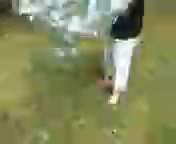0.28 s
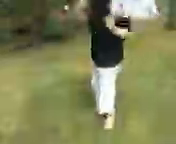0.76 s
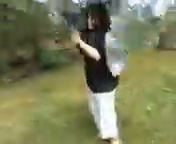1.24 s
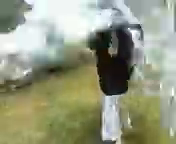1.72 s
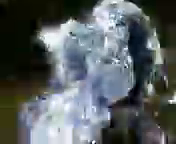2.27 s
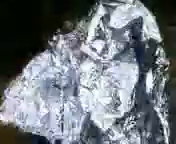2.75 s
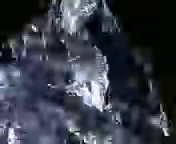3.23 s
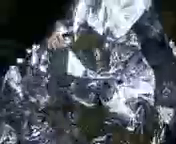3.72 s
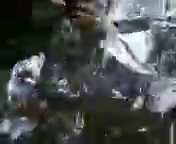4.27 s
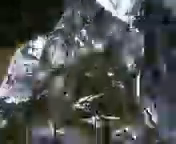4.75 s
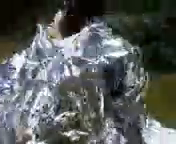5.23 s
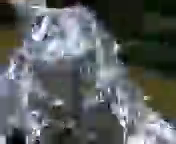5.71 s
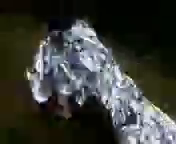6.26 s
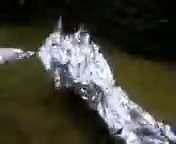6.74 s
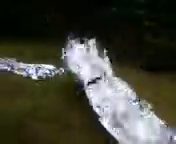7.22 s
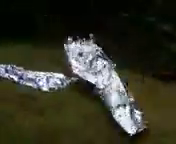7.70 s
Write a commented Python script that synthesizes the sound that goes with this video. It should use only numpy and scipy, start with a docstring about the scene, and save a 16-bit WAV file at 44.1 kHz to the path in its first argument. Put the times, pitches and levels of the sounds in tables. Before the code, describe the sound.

Close, dense rustling of a foil sheet swells and eases with occasional sharp cracks, while an engine hums nearby.

```python
"""Foil blanket on a lawn

A foil blanket is swung and gathered up: thousands of tiny creases snap through, large ones crack.
Pulled taut once, it rattles in a fast run of cracks; later its folds push three puffs of air.
An engine hums nearby over outdoor rumble, slowly sinking in pitch.
The small recorder passes only a telephone-wide band and overloads on the loudest cracks."""
import sys
import numpy as np
from scipy import signal
from scipy.fft import rfft, irfft, next_fast_len
from scipy.io import wavfile
from scipy.ndimage import uniform_filter1d

SR = 44100
rng = np.random.default_rng(int(sys.argv[2]) if len(sys.argv) > 2 else 0)


def transcribe(u):
    """Save the signal u as a 16-bit wav file named by the first command-line argument.

    u: samples, shape (n,) or (channels, n), limited to [-1, 1]; the rate is SR.
    q: integer samples, one column per channel.
    """
    v = np.clip(np.atleast_2d(u).T, -1, 1)
    q = np.round(v * 32767).astype(np.int16)
    wavfile.write(sys.argv[1], SR, q)


N = 351477

# swings and grabs: (peak time [s], level [dB], rise [s per 10 dB], fall [s per 10 dB], tightness [dB])
SHEET_SWINGS = [(.02, -12.5, 1.1, 0.3527, 5.5), (.79, -27.5, .25, 0.1, -3.5), (1.55, -23, 0.52, 0.2, -0.5),
                (2.15, -27, 0.2, .5, -0.5), (2.575, -20.5, 0.18, 0.14, 2), (2.98, -23, 0.25, 0.2, -1),
                (3.2, -22.5, 0.15, 0.23, -1.5), (3.47, -22, .17, .17, -2.5), (3.93, -15.5, 0.21, 0.08, 1.5),
                (4.01, -22, -0.02, -0.02, -3.5), (4.088, -19, .02, .04, 4), (4.18, -16.5, .06, 0.15, 3.5),
                (4.44, -23.5, 0.14, 0.56, -0.5), (4.82, -23.5, 0.1, 0.37, -4), (5.005, -16, 0.04, 0.15, 2),
                (5.2, -23, .2, 0.6, 0.5), (5.53, -24.5, .3, .22, 0), (6.09, -15.5, 0.0958, 0.34, 0),
                (6.369, -20, 0.26, 0.18, 0), (6.76, -24.5, 0.2, 0.22, 1.5), (6.95, -20.5, 0.13, 0.17, 0.5),
                (7.295, -15.5, .05, 0.1, 5.5), (7.62, -24.5, 0.15, .22, 2.5), (7.96, -22, .07, -0.6, 3)]
# crease spectrum: (frequency [Hz], gain [dB])
CREASE_SPECTRUM = [(150, -10.5), (250, -4), (480, 0), (750, 0.5), (1250, 3), (1500, 2.5), (1850, 2),
                   (2300, 0.5), (2750, 2), (3400, -3), (4200, -4)]
# air cupped by the billowing sheet: (time [s], half-width [s], resonance [Hz], gain [dB])
BILLOW_CAVITIES = [(0.022, 0.05, 1140, 3), (0.18, .08, 1000, 2.5), (3.873, 0.058, 1720, -4.5),
                   (3.921, 0.023, 604, 2), (5.094, 0.082, 1325, -2.5), (7.27, .04, 700, -0.5)]
# large creases giving way: (time [s], relative peak [dB])
LARGE_CRACKS = [(.007, 1), (.013, -0.5), (.045, -6.5), (.788, -12.5), (2.97, -8.5), (3.912, -11),
                (3.936, -5), (3.986, -8.5), (4.004, -8), (4.086, -1.5), (4.093, -7), (4.111, -7.5),
                (4.118, -4.5), (4.989, -8), (5.127, -11.5), (6.164, -7), (6.198, -8), (6.693, -9),
                (7.277, -10)]
# modes of a cracking panel: (frequency [Hz], gain [dB], T60 [s])
PANEL_MODES = [(700, -12.5, 0.0069), (1260, -5.5, 0.0085), (1660, -1.5, 0.0078), (1993, 0.5, 0.007),
               (2770, -4, 0.0063), (3230, -1.5, 0.0058), (3650, -3, 0.005)]
# air pushed by folds: (onset [s], envelope peak [dB], frequency [Hz])
FOLD_PUFFS = [(5.446, -19, 115), (5.556, -23, 99), (5.695, -21, 105)]
# engine hum: (time [s], level [dB])
HUM_LEVEL = [(0, -43), (.17, -41.5), (.44, -31.5), (.73, -31.5), (1.05, -28.5), (1.85, -30), (3.18, -33),
             (3.38, -37.5), (3.68, -29.5), (4.35, -25.5), (4.95, -26), (5.6, -33), (6.2, -33.5),
             (6.55, -29), (7.15, -29), (7.35, -32.5), (7.97, -23)]
# exhaust tone: (multiple of firing rate, relative level [dB])
EXHAUST_HARMONICS = [(1, 1), (2, -22), (3, -35.5), (5, -19.5)]
# outdoor rumble: (frequency [Hz], relative density [dB])
RUMBLE_SPECTRUM = [(15, -42), (25, -29), (40, -17.5), (62, -5), (90, -1), (130, -1), (185, 0), (260, -3.5),
                   (400, -6.5), (800, -15), (2000, -35)]
# air stirred at the microphone: (time [s], relative level [dB])
STIRRED_AIR_LEVEL = [(0, -36.5), (1.0, -34.5), (3.75, -37.5), (3.95, -32.5), (4.25, -31), (4.6, -35),
                     (5.05, -32), (5.7, -35), (7.97, -35)]
# brief surges just above the hum: (time [s], level [dB])
BASS_SWELLS = [(.58, -34), (1.042, -34.5), (2.0, -36)]


def crinkle(motion_db, tightness_db, snaps_per_s=4200, papery_hz=1860, papery_db=-9.5, width_hz=260):
    """Faster movement sets off more creases, a dense crackle of random snaps."""
    crease_rate = snaps_per_s * from_db((motion_db - np.mean(motion_db)) / 2)
    foil = creases(crease_rate, tightness_db) + from_db(-7) * facet_pops()
    foil = foil * from_db(0.16 * drift(45))
    # the commonest facet size gives a steady papery note
    foil = foil + from_db(papery_db) * resonance(foil, papery_hz, width_hz)
    for time_s, half_width_s, hz, db in BILLOW_CAVITIES:
        foil = foil + from_db(db) * bump(time_s, half_width_s) * resonance(foil, hz, width_hz)
    running_rms = np.sqrt(uniform_filter1d(foil ** 2, size=2000) + 1e-12)
    flutter_db = 0.7 * drift(18)
    return foil / running_rms * from_db(motion_db + 0.5 + flutter_db)


def creases(per_s, tightness_db, spread_db=2.5, patchy_db=2.5, sheet_share=0.34):
    """Whole-sheet snaps sound in every band; each facet size also ticks in its own band."""
    whole_sheet = unit_rms(snaps(per_s, spread_db))
    edges_hz = np.geomspace(170, 4600, num=17)
    out = 0
    for low_hz, high_hz in zip(edges_hz, edges_hz[1:]):
        facets = unit_rms(snaps(per_s / 2, spread_db))
        drive = np.sqrt(sheet_share) * whole_sheet + np.sqrt(1 - sheet_share) * facets
        band = signal.sosfilt(signal.butter(1, [low_hz, high_hz], "band", fs=SR, output="sos"), drive)
        hz = np.sqrt(low_hz * high_hz)
        tilt_db = 0.41 * tightness_db * np.log2(max(hz, 700) / 1800)  # tighter folds sound brighter
        out = out + band * from_db(spectrum_db(CREASE_SPECTRUM, hz) + tilt_db + patchy_db * drift(14))
    return unit_rms(out)


def facet_pops(per_s=240, t60_cycles=42, count=26):
    """Flat facets pop over, each ringing briefly at its own pitch."""
    pitches_hz = np.linspace(750, 3500, count) * from_db(.2 * rng.standard_normal(count))
    clicks = snaps(per_s, spread_db=1.9)
    facet = rng.integers(0, count, N)
    pops = sum(ring(clicks * (facet == k), hz, t60_cycles / hz) for k, hz in enumerate(pitches_hz))
    return unit_rms(pops)


def snaps(per_s, spread_db):
    """Random clicks, many small and few large, buckling either way."""
    sizes = from_db(spread_db * np.minimum(rng.exponential(1, N), 4.5))
    return sizes * rng.choice([-1, 1], N) * (rng.random(N) < per_s / SR)


def sheet_motion(rest_db=-31.0, rest_tightness_db=-4):
    """Level and tightness [dB]: swings add their power to a resting crinkle and blend their tightness."""
    t = np.arange(0, N + 100, 100) / SR
    power = np.full(len(t), from_db(rest_db) ** 2)
    weighted_tightness = power * rest_tightness_db
    for peak_s, db, rise_s, fall_s, tightness_db in SHEET_SWINGS:
        drop_db = 10 * np.maximum((peak_s - t) / rise_s, (t - peak_s) / fall_s)
        swing_power = from_db(db - drop_db) ** 2
        power += swing_power
        weighted_tightness += swing_power * tightness_db
    return per_sample(np.transpose([t, 10 * np.log10(power), weighted_tightness / power]))


def cracks(gain_db=-2.5, slip_decay_s=0.0015, stiffening=0.96):
    """A large crease gives way in a short burst of slips that rings the panel."""
    t = np.arange(SR // 40) / SR
    out = np.zeros(N + len(t))
    for time_s, peak_db in list(LARGE_CRACKS) + rattle():
        slips = rng.choice([-1, 1], len(t)) * np.exp(-t / slip_decay_s)
        crack = sum((-1) ** k * from_db(db) * ring(slips, hz, t60_s)
                    for k, (hz, db, t60_s) in enumerate(PANEL_MODES))
        # the film stiffens as it bends, rounding the peaks
        crack = np.tanh(stiffening * crack / np.max(np.abs(crack))) / np.tanh(stiffening)
        start = round(time_s * SR)
        out[start:start + len(t)] += from_db(peak_db + gain_db) * crack
    return out[:N]


def rattle(climax_s=4.172, gap_s=.0055, count=10, peak_db=2.0, rise_db_per_s=140, fall_db_per_s=400):
    """The taut sheet's run of cracks swells and breaks off: rows (time [s], relative peak [dB])."""
    offset_s = gap_s * (2 - np.arange(count) + .15 * rng.standard_normal(count))
    drop_db = np.maximum(-offset_s * rise_db_per_s, offset_s * fall_db_per_s)
    return list(zip(climax_s + offset_s, peak_db - drop_db))


def puffs(rise_s=.005):
    """Each flapping fold pushes one dull swing of air."""
    out = 0
    for onset_s, peak_db, hz in FOLD_PUFFS:
        age_s = np.maximum(np.arange(N) / SR - onset_s, 0)
        envelope = age_s / rise_s * np.exp(1 - age_s / rise_s)
        out = out + from_db(peak_db) * envelope * np.sin(2 * np.pi * hz * age_s)
    return out


def engine(start_hz=147.1, sag_hz_per_s=1.72, wander=.003, throb_db=1.28):
    """Exhaust hum with faint overtones; the firing is slightly uneven and slows steadily."""
    firing_hz = (start_hz - sag_hz_per_s * np.arange(N) / SR) * (1 + wander * drift(4.5))
    phase = 2 * np.pi * np.cumsum(firing_hz) / SR
    tone = sum(from_db(db) * np.sin(k * phase) for k, db in EXHAUST_HARMONICS)
    hum_db, = per_sample(HUM_LEVEL)
    return unit_rms(tone) * from_db(hum_db + throb_db * drift(30))


def rumble(motion_db, air_gain_db=2.0, motion_share=.2, deep_gain_db=-34.5, split_hz=100):
    """Steady deep outdoor rumble; above it, air stirred by the sheet comes and goes."""
    air_db = per_sample(STIRRED_AIR_LEVEL)[0] + motion_share * (motion_db - np.mean(motion_db))
    hz = np.maximum(np.fft.rfftfreq(N, 1 / SR), 1)
    spectrum = rfft(rng.standard_normal(N)) * from_db(spectrum_db(RUMBLE_SPECTRUM, hz))
    noise = unit_rms(irfft(spectrum, N))
    deep = irfft(rfft(noise) / (1 + (hz / split_hz) ** 6), N)
    return deep * from_db(deep_gain_db) + (noise - deep) * from_db(air_db + air_gain_db)


def bass_swells(hz=212.5, width_hz=35, half_width_s=.09):
    """Short, soft surges of narrow low noise."""
    noise = resonance(resonance(rng.standard_normal(N), hz, width_hz), hz, width_hz)
    return unit_rms(noise) * sum(from_db(db) * bump(time_s, half_width_s) for time_s, db in BASS_SWELLS)


def from_db(db):
    """Decibels to gain."""
    return 10 ** (np.asarray(db) / 20)


def unit_rms(x):
    """Scale to RMS 1."""
    return x / np.sqrt(np.mean(x ** 2) + 1e-20)


def per_sample(rows):
    """Interpolate rows (time [s], values...) to one curve per value column."""
    times_s, *columns = np.transpose(rows)
    return [np.interp(np.arange(N) / SR, times_s, column) for column in columns]


def spectrum_db(rows, hz):
    """Interpolate a spectrum over log frequency."""
    knots_hz, knots_db = np.transpose(rows)
    return np.interp(np.log(hz), np.log(knots_hz), knots_db)


def drift(rate_hz):
    """Smooth random curve, RMS 1."""
    pole = np.exp(-40 * np.pi * rate_hz / SR)
    noise = rng.standard_normal(N // 20 + 4002)
    slow = signal.lfilter([1], [1, -2 * pole, pole * pole], noise)[4000:]
    return np.interp(np.arange(N) / 20, np.arange(len(slow)), unit_rms(slow))


def bump(time_s, half_width_s):
    """Gaussian envelope, peak 1."""
    return np.exp(-((np.arange(N) / SR - time_s) / half_width_s) ** 2)


def ring(clicks, hz, t60_s):
    """Damped mode: a unit click starts a sine of height 1."""
    radius, angle = from_db(-60 / (t60_s * SR)), 2 * np.pi * hz / SR
    return signal.lfilter([0, np.sin(angle)], [1, -2 * radius * np.cos(angle), radius ** 2], clicks + 1e-18)


def resonance(x, hz, width_hz):
    """Resonant band-pass, peak gain 1."""
    radius, angle = np.exp(-np.pi * width_hz / SR), 2 * np.pi * hz / SR
    numerator = np.array([1, 0, -1]) * (1 - radius ** 2) / 2
    return signal.lfilter(numerator, [1, -2 * radius * np.cos(angle), radius ** 2], x)


def scene():
    """Blanket close by, engine and rumble behind; mono."""
    motion_db, tightness_db = sheet_motion()
    blanket = crinkle(motion_db, tightness_db) + cracks() + puffs()
    return (blanket + engine() + rumble(motion_db) + bass_swells())[None]


def record(dry, headroom=0.85, overload=.73, cutoff_hz=16000):
    """The microphone adds a bright peak and rounds big swings; treble is cut, overshoots clip."""
    bright = dry + from_db(-6.5) * resonance(dry, hz=3360, width_hz=420)
    rounded = bright / (1 + (bright / headroom) ** 6) ** (1 / 6)
    fft_size = next_fast_len(N + SR // 10)
    hz = np.fft.rfftfreq(fft_size, 1 / SR)
    voice_band_db = np.interp(hz, [3475, 4543, 4793], [0, -32, -90])
    narrow = irfft(rfft(rounded, fft_size) * from_db(voice_band_db), fft_size)[:, :N]
    clipped = np.clip(narrow, -overload, overload)
    return signal.sosfilt(signal.cheby2(12, 70, cutoff_hz, fs=SR, output="sos"), clipped)


dry = scene()
out = record(dry)
transcribe(out)
```